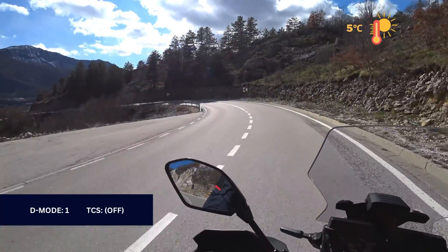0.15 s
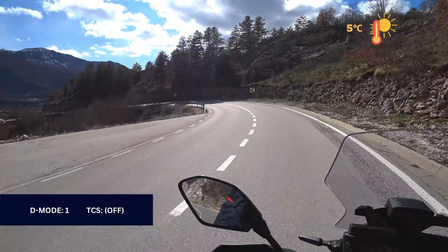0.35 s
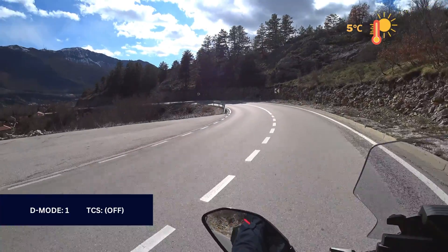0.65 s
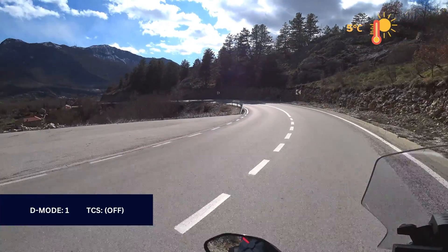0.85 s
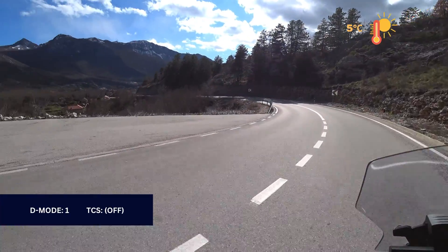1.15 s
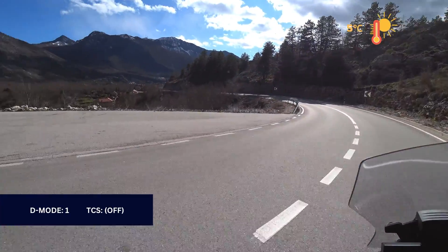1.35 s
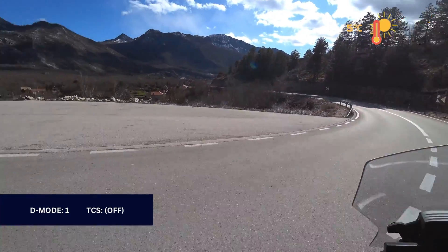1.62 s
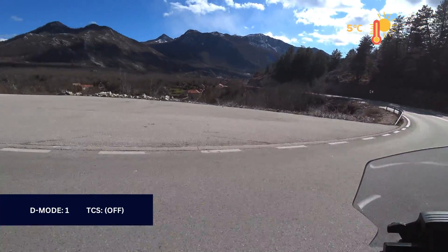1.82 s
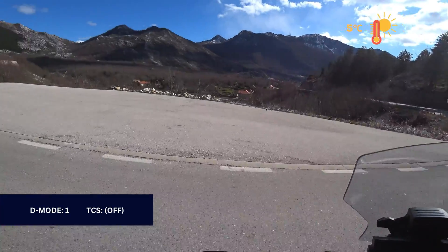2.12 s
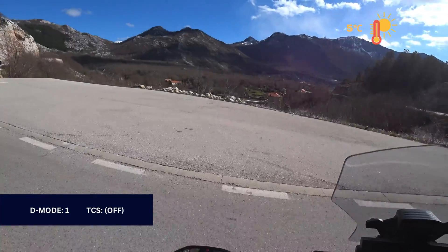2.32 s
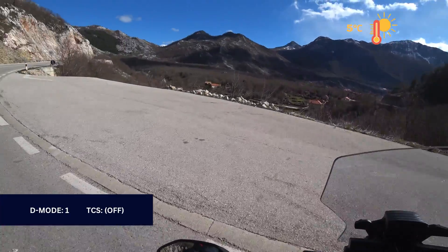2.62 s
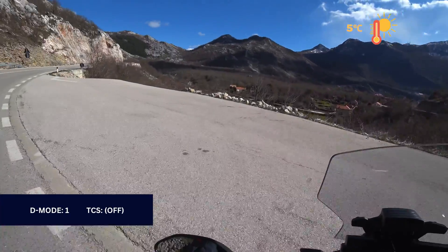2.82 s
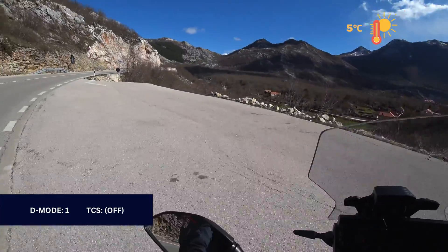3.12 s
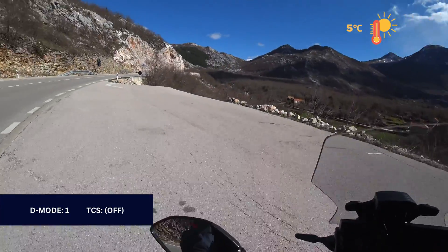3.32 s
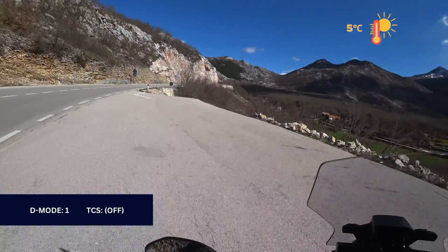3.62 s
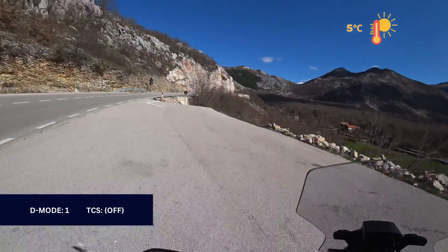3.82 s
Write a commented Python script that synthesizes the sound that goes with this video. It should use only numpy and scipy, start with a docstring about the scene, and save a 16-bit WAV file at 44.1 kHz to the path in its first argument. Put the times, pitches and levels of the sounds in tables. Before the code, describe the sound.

A motorcycle engine thumps steadily just above idle, then a dull gearbox clunk near the end.

```python
"""At the roadside, from the rider's seat: a motorcycle rolls in with its engine just above idle.
Each firing is a deep, soft thump, a sum of harmonics locked to the firing cycle, with a short pipe ring.
Shaped noise gives valve clatter and ticks, sines give gear whine, and faint wind and tyre noise lie below.
Near the end struck resonances make the gearbox clunk, the brake hisses (filtered noise) and briefly
judders (a low harmonic tone), and the drive chain rustles (filtered noise)."""
import sys
import numpy as np
from scipy import signal
from scipy.fft import rfft, irfft
from scipy.io import wavfile
from scipy.ndimage import uniform_filter1d, minimum_filter1d

SR = 44100
rng = np.random.default_rng(int(sys.argv[2]) if len(sys.argv) > 2 else 0)


def pcm_store(signal):
    """Save signal as 16-bit PCM."""
    levels = np.round(np.clip(np.atleast_2d(signal), -1, 1) * 32767)
    wavfile.write(sys.argv[1], SR, levels.astype(np.int16).T)


N = 174195
TIME = np.arange(N) / SR

# Engine speed: time_s, firings_per_s
ENGINE_SPEED = [(0.0, 33.17), (0.36, 35.04), (0.43, 34.63), (0.79, 35.48), (0.86, 34.21), (1.29, 32.8),
                (1.36, 33.61), (1.44, 32.25), (1.58, 34.95), (2.15, 33.56), (2.3, 34.31), (2.73, 33.8),
                (2.8, 32.82), (3.09, 35.95), (3.23, 34.06), (3.3, 34.62), (3.66, 32.09), (3.95, 34.67)]
FIRST_FIRING_S = .026
# Strength of the firings: time_s, gain_db
FIRING_EFFORT = [(0, -1.9), (1.0, -1.25), (2.2, -1), (2.9, -0.26), (3.38, 0), (3.45, -1.2), (3.6, -2),
                 (3.75, 1.0), (3.95, -1)]
# Harmonics of one thump, before effort: firing_rate_multiple, rms_level_db
THUMP_HARMONICS = [(1, -33.5), (2, -22.5), (3, -20), (4, -16.5), (5, -18), (6, -21.5), (7, -23.5), (8, -31),
                   (9, -51.5), (10, -47), (11, -50)]
# Phase quadratic about this multiple delays the higher harmonics: each thump sweeps slightly upward
SWEEP_CENTRE, SWEEP_RAD = 4.96, .065
# Lean, weak firings, before rebound: time_s, gain_db
LEAN_FIRINGS = [(.232, -2.5), (1.40, -6.5), (1.927, -5.5), (2.37, -3.5)]
FIRING_SPREAD_DB, FIRING_JITTER_S, REBOUND_SHARE = 0.15, .00012, .22
PIPE_HZ, PIPE_T60_S, PIPE_DB, PIPE_SPREAD_DB = 260.3, .07, -24, 3

# Valve gear and cases, before load: frequency_hz, density_db_per_hz
CLATTER_SPECTRUM = [(300, -69), (400, -66), (500, -70.5), (750, -82), (1000, -83), (1120, -80.5),
                    (1320, -86.5), (1600, -81), (1860, -88.5), (2150, -82), (2380, -86), (2620, -85.5),
                    (2740, -91), (2850, -89), (3080, -95.5), (3450, -102), (3800, -100), (4020, -94),
                    (4220, -100), (4420, -99.5), (5300, -110), (8300, -110), (11500, -112), (15500, -119)]
CLATTER_SWING_DB, CLATTER_LEAD_CYCLES, CLATTER_ROUGH_DB = 1.37, 0.15, 1.5
# Load on the gears and valve train: time_s, gain_db
MACHINERY_LOAD = [(0, -2), (.8, .5), (1.4, -1.45), (2.6, 0), (3.3, 1.5), (3.6, 3.5), (3.95, 3)]
# Gear whine, before load and flutter: firing_rate_multiple, rms_level_db
GEAR_PARTIALS = [(32, -60.5), (46, -67), (61, -60.5), (63, -59.5), (65, -61), (77, -66.5)]
# The ripple is a fraction of the crank speed
CRANK_RIPPLE, GEAR_WANDER_CYCLES, GEAR_SWING_DB, GEAR_FLUTTER_DB = 0.027, 0.0038, 3, 3.5
# Valve tick, before its decay envelope: frequency_hz, density_db_per_hz
TICK_SPECTRUM = [(1200, -105), (2300, -87.5), (3300, -103), (4300, -99), (5500, -106), (8500, -103),
                 (11500, -104), (15500, -114)]
TICK_DECAY_S, TICK_JITTER_S, TICK_SPREAD_DB = .003, 0.0014, 4

# Gear dogs strike and bounce: time_s, strike_db
DOG_STRIKES = [(3.4174, -14.5), (3.426, -3.5), (3.4357, -5), (3.4436, -10.5), (3.4551, -16.5)]
# Modes of gearbox and frame, for a unit strike before the band limit: frequency_hz, level_db, t60_s
CASE_MODES = [(95, -4.5, .08), (160, -0.5, 0.071), (257, 1.5, 0.084), (334, -3, 0.071), (542, -17.5, 0.03),
              (760, -16.5, 0.021), (1015, -14.5, 0.017), (1660, -28.5, .018)]
CLUNK_BAND_HZ, CLUNK_SPREAD_DB = (89, 1330), 1
# Shift lever clicks, before the band limit: time_s, strike_db
LEVER_CLICKS = [(3.446, -41.5)]
CLICK_BAND_HZ, CLICK_DECAY_S = (3000, 9000), .0012

# Brake pad on the disc, before its swell: frequency_hz, density_db_per_hz
BRAKE_SPECTRUM = [(5000, -115), (6300, -95.5), (7400, -91.5), (7700, -96), (7880, -86), (8100, -95.5),
                  (8500, -105), (9100, -95.5), (9350, -100), (9600, -86), (9850, -99.5), (10200, -105),
                  (10620, -94), (11100, -105), (13500, -111), (15100, -103)]
# Swell of the brake hiss: start_s, attack_s, hold_s, release_s, gain_db
BRAKE_SWELL = (3.236, 0.3, .01, 0.23, 1.5)
# Swell of the brake judder: start_s, attack_s, hold_s, release_s, gain_db
JUDDER_SWELL = (3.505, .055, .045, .075, 0)
# Harmonics of the judder, before its swell: judder_rate_multiple, rms_level_db
JUDDER_HARMONICS = [(1, -22.5), (2, -19), (3, -33)]
JUDDER_HZ, JUDDER_WANDER = 133.4, .035  # the wander is a fraction of the rate
BRAKE_FLUTTER_DB, CHAIN_FLUTTER_DB = 1.5, 1.0
# Chain over the sprockets, before its swell: frequency_hz, density_db_per_hz
CHAIN_SPECTRUM = [(200, -59.5), (340, -48.5), (450, -61), (620, -62.5), (770, -56), (980, -67),
                  (1100, -64.5), (1250, -73.5), (1600, -75.5), (1850, -87), (2750, -80), (3100, -91.5),
                  (3450, -103), (4020, -88.5), (4400, -108)]
# Swell of the chain: start_s, attack_s, hold_s, release_s, gain_db
CHAIN_SWELL = (3.37, .23, .07, .27, -.5)

# Wind and tyres, before their level curve: frequency_hz, density_db_per_hz
WIND_SPECTRUM = [(15, -56), (45, -47), (90, -52.5), (170, -51.5), (260, -54.5), (340, -61.5), (450, -69.5),
                 (750, -80), (1100, -82), (1800, -93.5), (3300, -107), (6000, -111), (11000, -112),
                 (15500, -117)]
# Level of wind and tyres: time_s, gain_db
WIND_LEVEL = [(0, 6.5), (.25, 3.5), (.5, 1), (1.1, 2), (1.45, 2), (1.7, 1), (2.0, 2), (2.7, 0), (3.3, 1.5),
              (3.95, 0)]
GUST_DB = 1.5
# Tread on the asphalt, at the start: frequency_hz, density_db_per_hz
TREAD_SPECTRUM = [(380, -63.5), (600, -76.5), (780, -73.5), (950, -77.5), (1120, -71), (1400, -89.5),
                  (2500, -120)]
TREAD_FADE_DB_PER_S = 9
CUTOFF_HZ = 15700
NO_UNDERFLOW = 1e-18  # inaudible offset that keeps decaying filters clear of vanishing numbers


def from_db(db):
    """Logarithmic level: decibels become an amplitude ratio."""
    return 10 ** (np.asarray(db) / 20)


def in_time(rows):
    """Linear interpolation: (s, value) rows become a curve at every sample."""
    return np.interp(TIME, *np.transpose(rows))


def drift(rate_hz):
    """Low-passed chance: white noise through a double pole, scaled to spread 1."""
    step, settling = 40, 2000
    pole = np.exp(-2 * np.pi * rate_hz * step / SR)
    chance = rng.standard_normal(N // step + settling + 2)
    slow = signal.lfilter([1], [1, -2 * pole, pole * pole], chance)[settling:]
    return np.interp(np.arange(N) / step, np.arange(len(slow)), slow / slow.std())


def noise(spectrum):
    """Spectral shaping: white noise is weighted to a density in dB per Hz."""
    hz, db = np.transpose(spectrum)
    bins = np.maximum(np.fft.rfftfreq(N, 1 / SR), 1)
    weight = from_db(np.interp(np.log(bins), np.log(hz), db))
    return irfft(rfft(rng.standard_normal(N)) * weight, N) * np.sqrt(SR / 2)


def strikes(s, gains):
    """Impulsive excitation: one-sample clicks at the given times."""
    samples = np.clip(s * SR, 0, N).astype(int)
    return np.bincount(samples, gains, N + 1)[:N]


def ring(clicks, hz, t60):
    """Damped resonance: a unit click starts a decaying sine of initial height 1."""
    pole, angle = np.exp(-np.log(1000) / (t60 * SR)), 2 * np.pi * hz / SR
    feedback = [1, -2 * pole * np.cos(angle), pole * pole]
    return signal.lfilter([0, np.sin(angle)], feedback, clicks + NO_UNDERFLOW)


def decay(clicks, decay_s):
    """Exponential relaxation: each click leaves an envelope falling by 1/e in decay_s."""
    return signal.lfilter([1], [1, -np.exp(-1 / (decay_s * SR))], clicks + NO_UNDERFLOW)


def band(sound, edges_hz):
    """Band limitation: a second-order Butterworth design passes the given range."""
    return signal.sosfilt(signal.butter(2, edges_hz, "band", fs=SR, output="sos"), sound)


def swell(start, attack, hold, release, db):
    """Amplitude envelope: a sine-squared rise, a hold and a fall."""
    ramp = np.interp(TIME, start + np.cumsum([0, attack, hold, release]), [0, 1, 1, 0])
    return from_db(db) * np.sin(np.pi / 2 * ramp) ** 2


def firings(cycle):
    """Periodic pulsation: each cycle gives a pressure dip of its own strength, and the pipe rings on."""
    numbers = np.arange(int(cycle[-1]) + 1)
    firing_s = np.interp(numbers, cycle, TIME)
    strength, late, pipe = rng.standard_normal((len(firing_s), 3)).T
    db = FIRING_SPREAD_DB * strength
    for weak_s, weak_db in LEAN_FIRINGS:
        db[np.argmin(abs(firing_s - weak_s))] = weak_db
    db = db - REBOUND_SHARE * np.append(0, db[:-1])  # a weak firing strengthens the next

    nearest = np.clip(np.round(cycle), 0, numbers[-1]).astype(int)
    gain = uniform_filter1d(from_db(db)[nearest], size=400)
    late_s = uniform_filter1d(late[nearest], size=400) * FIRING_JITTER_S
    turn = cycle + late_s * in_time(ENGINE_SPEED)
    thumps = np.zeros(N)
    for k, level in THUMP_HARMONICS:
        sweep = SWEEP_RAD * (k - SWEEP_CENTRE) ** 2
        thumps -= np.sqrt(2) * from_db(level) * np.cos(2 * np.pi * round(k) * turn - sweep)

    pipe_gains = from_db(PIPE_DB + PIPE_SPREAD_DB * pipe)
    pipe_clicks = strikes(firing_s + .5 / PIPE_HZ, pipe_gains)  # half a pipe period late
    tail = band(ring(pipe_clicks, PIPE_HZ, PIPE_T60_S), [PIPE_HZ / 10, 2 * PIPE_HZ])
    return from_db(in_time(FIRING_EFFORT)) * (gain * thumps + tail)


def machinery(cycle):
    """Cyclic modulation: clatter and whine swell before each firing; crank speed ripple wobbles the whine."""
    beat = np.cos(2 * np.pi * (cycle + CLATTER_LEAD_CYCLES))
    clatter_db = CLATTER_SWING_DB * beat + CLATTER_ROUGH_DB * drift(100)
    clatter = noise(CLATTER_SPECTRUM) * from_db(clatter_db)

    # The crank slows before each firing and is kicked on after it
    ripple = CRANK_RIPPLE * np.cos(2 * np.pi * cycle) / (2 * np.pi)
    crank = cycle - ripple + GEAR_WANDER_CYCLES * drift(20)
    whine = np.zeros(N)
    for k, db in GEAR_PARTIALS:
        level = from_db(db + GEAR_FLUTTER_DB * drift(20))
        whine += np.sqrt(2) * level * np.sin(2 * np.pi * k * crank)
    whine *= from_db(GEAR_SWING_DB * beat)
    return from_db(in_time(MACHINERY_LOAD)) * (clatter + whine)


def valve_ticks(cycle):
    """Impact noise: once a cycle a seating valve gives a faint, decaying tick of uneven strength."""
    tick_cycles = np.arange(1, int(cycle[-1]) + 1) - CLATTER_LEAD_CYCLES
    tick_s = np.interp(tick_cycles, cycle, TIME)
    strength, late = rng.standard_normal((len(tick_s), 2)).T
    clicks = strikes(tick_s + TICK_JITTER_S * late, from_db(TICK_SPREAD_DB * strength))
    return noise(TICK_SPECTRUM) * decay(clicks, TICK_DECAY_S)


def gear_change():
    """Modal excitation: dogs knocking into mesh ring the case in a dull clunk; the lever clicks."""
    strike_s, strike_db = np.transpose(DOG_STRIKES)
    clunk = np.zeros(N)
    for k, (hz, level, t60) in enumerate(CASE_MODES):
        db = strike_db + level + rng.normal(0, CLUNK_SPREAD_DB, len(strike_s))
        clunk += (-1) ** k * ring(strikes(strike_s, from_db(db)), hz, t60)  # alternate polarity

    click_s, click_db = np.transpose(LEVER_CLICKS)
    burst = decay(strikes(click_s, from_db(click_db)), CLICK_DECAY_S) * rng.standard_normal(N)
    return band(clunk, CLUNK_BAND_HZ) + band(burst, CLICK_BAND_HZ)


def brake():
    """Dry friction: the pad hisses on the disc, then sticks and slips in a short low groan."""
    slips = np.cumsum(JUDDER_HZ * (1 + JUDDER_WANDER * drift(25))) / SR
    groan = np.zeros(N)
    for k, db in JUDDER_HARMONICS:
        groan += np.sqrt(2) * from_db(db) * np.sin(2 * np.pi * round(k) * slips)
    hiss = noise(BRAKE_SPECTRUM) * from_db(BRAKE_FLUTTER_DB * drift(40))
    return hiss * swell(*BRAKE_SWELL) + groan * swell(*JUDDER_SWELL)


def chain():
    """Contact noise: the chain's rustle swells around the gear change and dies away."""
    return noise(CHAIN_SPECTRUM) * swell(*CHAIN_SWELL) * from_db(CHAIN_FLUTTER_DB * drift(60))


def road():
    """Broadband flow and rolling noise: lumpy wind rumble, and tread roar fading as the bike slows."""
    wind = noise(WIND_SPECTRUM) * from_db(in_time(WIND_LEVEL) + GUST_DB * drift(8))
    tread = noise(TREAD_SPECTRUM) * from_db(-TREAD_FADE_DB_PER_S * TIME)
    return wind + tread


def scene():
    """Superposition: one firing cycle drives the engine sounds, and all sources add at one microphone."""
    cycle = np.cumsum(in_time(ENGINE_SPEED)) / SR
    cycle = cycle - np.interp(FIRST_FIRING_S, TIME, cycle)  # whole numbers are firings
    engine = firings(cycle) + machinery(cycle) + valve_ticks(cycle)
    return (engine + gear_change() + brake() + chain() + road())[None]


def record(dry):
    """Gain control and band limitation: end fades, a full-scale peak limiter, then a steep low-pass."""
    from_end = np.minimum(TIME, TIME[::-1])
    dry = dry * np.sin(np.pi / 2 * np.minimum(from_end / .004, 1)) ** 2  # 4 ms fades
    room_left = 1 / np.maximum(abs(dry), 1)
    gain = minimum_filter1d(room_left, size=200)
    gain = uniform_filter1d(uniform_filter1d(gain, size=100), size=100)
    low_pass = signal.ellip(10, .1, 80, CUTOFF_HZ, fs=SR, output="sos")
    return signal.sosfilt(low_pass, dry * gain)


dry = scene()
out = record(dry)
pcm_store(out)
```